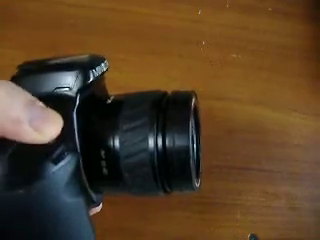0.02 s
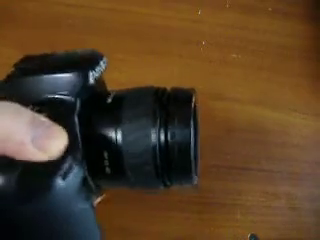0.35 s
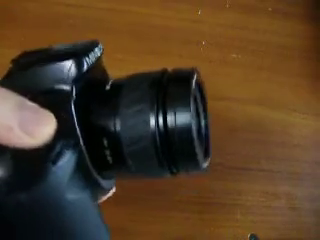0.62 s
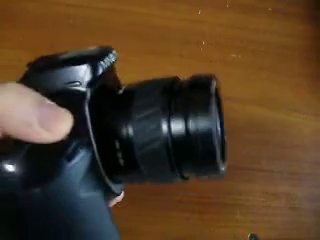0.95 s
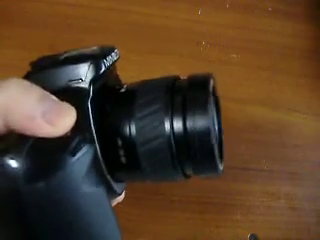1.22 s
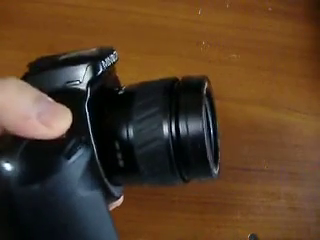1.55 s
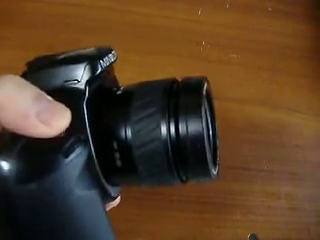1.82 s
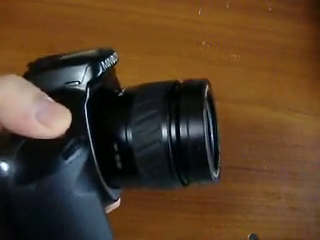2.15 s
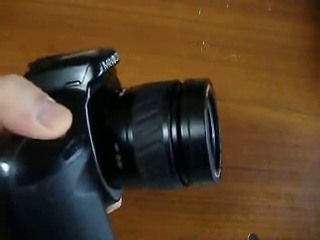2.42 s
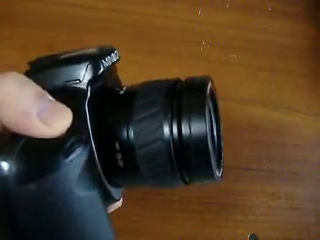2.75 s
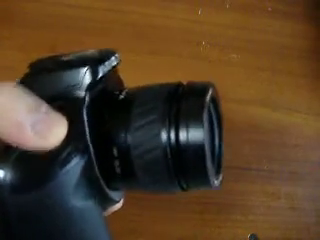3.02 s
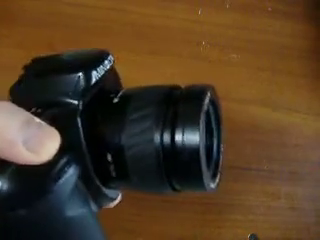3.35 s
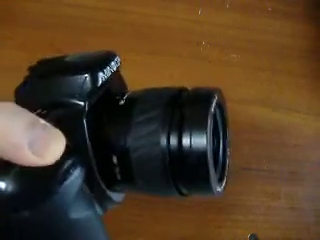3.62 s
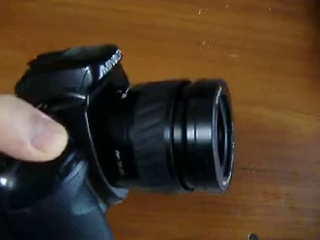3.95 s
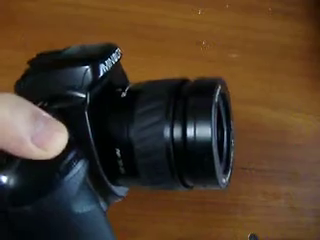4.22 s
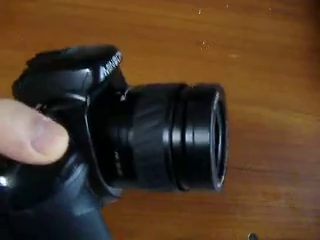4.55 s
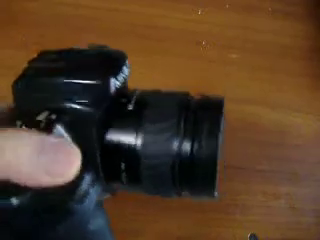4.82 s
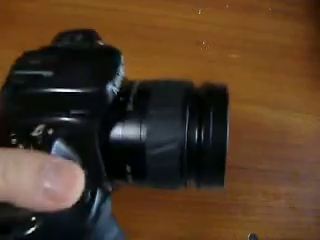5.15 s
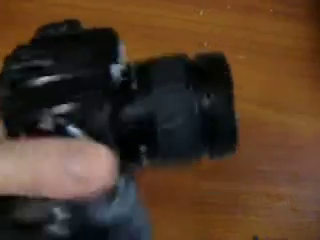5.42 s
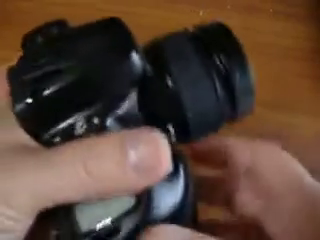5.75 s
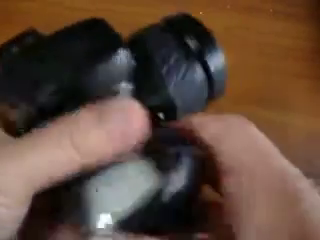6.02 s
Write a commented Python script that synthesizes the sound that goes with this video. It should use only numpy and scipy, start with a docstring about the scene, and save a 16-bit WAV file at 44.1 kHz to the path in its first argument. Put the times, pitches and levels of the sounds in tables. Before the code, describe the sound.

Small plastic gears whir and click as a camera lens hunts for focus, first in longer bursts, then in tiny chirps. The shutter then snaps loudly several times within half a second while a fast motor winds the film. Finally the hand shifts on the camera body, making faint ticks and two dull, hollow knocks. Everything is close and fairly dry, indoors, over constant microphone hiss, low rumble and a faint high whistle.

```python
"""A film SLR camera hunts for focus and fires, close to a hissy little microphone in a quiet room.
Plastic autofocus gears whine and rattle in six short bursts; then mirror and shutter clack while
a second, raspy motor cocks the mirror and winds the film on. Button and shell give small ticks, and
the hand shifts its grip over a wooden table: two dull, hollow knocks with a low thump.
Underneath lies a bed of hiss, low rumble and a thin electrical whistle."""
import sys
import numpy as np
from scipy import signal
from scipy.fft import rfft, irfft, next_fast_len
from scipy.io import wavfile
from scipy.ndimage import uniform_filter1d

SR = 44100
rng = np.random.default_rng(int(sys.argv[2]) if len(sys.argv) > 2 else 0)


def int16_out(signal):
    """Quantize to a 16-bit WAV file."""
    q = np.round(np.clip(np.atleast_2d(signal).T, -1, 1) * 32767)
    wavfile.write(sys.argv[1], SR, q.astype(np.int16))


N = 267775
TIME = np.arange(N) / SR

# EQ curves of the noise bed and of each camera sound: (frequency [Hz], gain [dB])
FLOOR_EQ = [(12, -49.5), (20, 2), (22, -9), (54, 4), (96, -2.5), (134, -1), (173, -5), (326, -7),
            (389, -9.5), (442, -9), (753, -13), (3200, -19.5), (6670, -19.5), (7200, -19), (8600, -25.5),
            (11200, -59), (18900, -120)]
TICK_EQ = [(300, -34), (1300, -16), (1900, -1.5), (3000, 6), (4500, -9), (8000, -11.5)]
KNOCK_EQ = [(120, -12), (330, -11), (550, 1), (950, 0), (1200, -5), (1700, 0), (2100, -8), (2900, -19),
            (3500, -13), (4600, -24), (6000, -35), (8500, -42)]
WIND_EQ = [(150, -26), (400, -9), (850, -1.5), (1150, -15), (1600, 4), (2200, -0.5), (3000, 6.5),
           (3600, -1), (4400, 1), (5000, -1), (5800, 3), (6600, -0.5), (8300, -6.5)]
FOCUS_EQ = [(120, -32.5), (220, -17.5), (370, -15.5), (530, -22.5), (780, -6.5), (1050, -14.5), (1400, -10),
            (1650, -1.5), (1950, -11), (2650, -6), (3500, -7), (4150, -5.5), (5400, -11.5), (6800, -7),
            (8500, -17.5)]
SHUTTER_EQ = [(120, -62), (200, -16), (467, -18.5), (847, -3.5), (1210, -8.5), (1540, 1), (1860, 2),
              (2040, -0.5), (2310, -5), (2700, 4.5), (3420, -5.5), (4400, 0), (6510, 0), (7980, -2.5),
              (8500, -10), (11000, -26), (18700, -120)]
# the microphone's electrical whistle, two close tones: (frequency [Hz], level [dB])
WHISTLE_TONES = [(7290, -60.5), (7356.5, -65)]
# rumble of the moving hands: (peak time [s], level [dB], rise [s], fall [s])
RUMBLE_SWELLS = [(3.5, -46, 0.5, 0.54), (5.5, -38.5, .08, 0.28)]
# cue lists of hard hits: (time [s], level [dB], ring time [s], treble tilt [dB/octave])
SHELL_TICKS = [(0.0655, -30, 0.01, -2), (2.7676, -32.5, 0.0064, 12.5), (4.8085, -44, 0.015, 2),
               (4.8838, -34, 0.0057, -0.5), (5.0858, -41.5, 0.011, -9), (5.4372, -31, .008, -1)]  # button and shell; the last row is the bright snap of the hand's second knock
GRIP_KNOCKS = [(5.3467, -19.5, 0.027, 0), (5.407, -39.5, 0.054, 3), (5.417, -37.5, 0.063, -3),
               (5.434, -25.5, 0.024, 2.5), (5.4635, -36, 0.0097, -1.5)]  # the hand shifts its grip
BACKLASH_HITS = [(0.894, -38.5, 0.013, -10.5), (1.116, -31, 0.025, -7.5), (1.504, -25, 0.045, -4.5),
                 (1.718, -37, 0.02, -3), (1.7255, -30.5, 0.04, -2), (3.303, -41, .02, -12),
                 (3.323, -40, 0.014, -3), (3.338, -32, 0.013, -5)]  # focus gears take up slack or meet a stop
PAWL_CATCHES = [(4.414, -38, 0.034, -1), (4.5006, -28, 0.008, -5), (4.5293, -24, 0.027, 1)]  # the pawl of the film transport catches
# soft pushes behind the knocks: (time [s], peak level [dB], contact time [s])
GRIP_PUSHES = [(5.351, -18.5, 0.0098), (5.423, -15.5, 0.0124), (5.439, -18, 0.01), (5.478, -23.5, 0.0091)]
# what a knock rings and what a push sets swaying: (frequency [Hz], relative level [dB], ring time [s])
HOLLOW_MODES = [(545, 9.5, 0.041), (700, -9, 0.066), (810, -14, .05), (985, -8, 0.055), (1340, -12, .08),
                (1570, -17, .025), (1735, 4.5, 0.043), (1870, -3, 0.11)]
SWAY_MODES = [(56.6, -3, 0.15), (88.5, -3.5, 0.12), (113.8, -1, 0.22), (134, -20, 0.088)]
# winding runs, mirror then film:
# (start [s], time under power [s], relative level [dB], unloaded tooth rate [Hz])
WIND_RUNS = [(4.181, .112, -29.5, 3066), (4.383, .182, -29, 2960)]
# whine of the winding gears: (pitch [x tooth rate], relative level [dB])
WIND_TONES = [(.333, -22), (1, -5), (1.17, -11), (1.79, -8), (2.06, -11), (2.29, -12), (2.94, -18)]
# autofocus bursts: (start [s], time under power [s], relative level [dB], swell [dB/s],
# unloaded tooth rate [Hz], direction [1 inward, 0 outward])
FOCUS_RUNS = [(0.887, .237, -34, 11, 819.5, 0), (1.256, .260, -30.5, 7.5, 797, 1),
              (1.709, .102, -36.5, -26, 560, 0), (3.296, 0.12, -32.5, -62, 560, 0),
              (3.582, 0.042, -38.5, -70, 420.6, 0), (3.792, 0.0096, -41, -61, 300, 0)]
# whine of the focus gears, relative levels: (pitch [x tooth rate], outward [dB], inward [dB], coasting [dB])
FOCUS_TONES = [(.48, -34, -25, -35), (.87, -21, -34, -35), (1, -15, -16, -26), (2, -15.5, -20, -18),
               (2.14, -25, -22, -24), (2.33, -27, -19, -26), (2.6, -21, -25, -24), (3, -19, -15, -13),
               (3.3, -23, -14, -20), (3.5, -15.5, -18, -22), (4, -24, -19, -22), (5.27, -22, -20, -13),
               (5.6, -21, -22, -14), (8.1, -22, -27, -14)]
# resonances of the lens barrel: (frequency [Hz], width [Hz], relative level [dB])
BARREL_MODES = [(1565, 55, 4), (1675, 70, 4), (2700, 250, -4), (4100, 200, -3)]
# strokes of mirror and shutter: (time [s], release level [dB], treble tilt [dB/octave], travel [s],
# landing level [dB], landing ring time [s], chatter level [dB], chatter change [dB/bounce])
SHUTTER_STROKES = [(4.1827, -35, 3, 0.0098, -33.5, 0.014, -46, -2),
                   (4.2133, -14.5, 0.5, 0.018, -16, .009, -26.5, -2.5),
                   (4.2817, -12, 4.5, 0.018, -20, 0.061, -15.5, -3.5),
                   (4.3714, -20, -0.5, .0128, -19.5, 0.037, -26.5, -8),
                   (4.5622, -14, 0, 0.016, -17.5, 0.035, -26.5, 2)]

WHEEL_TEETH = 9


def undb(db):
    """Decibels to gain."""
    return 10 ** (np.asarray(db) / 20)


def unit(x):
    """Scale to rms 1."""
    return x / np.sqrt(np.mean(x ** 2) + 1e-30)


def wander(rate):
    """Random drift of rms 1 that takes a new turn rate times a second."""
    return unit(np.interp(TIME * rate, np.arange(N), rng.standard_normal(N)))


def eq(x, curve, tilt_db=0):
    """EQ along a curve, with a tilt per octave above 600 Hz."""
    size = next_fast_len(2 * len(x))
    size += size % 2
    hz, db = np.transpose(curve)
    f = np.clip(np.arange(size // 2 + 1) * SR / size, hz[0], hz[-1])
    gain = undb(np.interp(np.log(f), np.log(hz), db) + tilt_db * np.log2(np.maximum(f / 600, 1)))
    # minimum phase: nothing rings ahead of an attack
    cepstrum = irfft(np.log(gain))
    cepstrum[1:size // 2] *= 2
    cepstrum[size // 2 + 1:] = 0
    return irfft(rfft(x, size) * np.exp(rfft(cepstrum)))[:len(x)]


def resonate(x, hz, width):
    """One resonance, gain 1 at its centre."""
    return signal.lfilter(*signal.iirpeak(hz, hz / width, fs=SR), x)


def ring(modes, t):
    """Struck modes ringing out."""
    return sum(undb(db - 60 * t / t60) * np.sin(2 * np.pi * hz * t) for hz, db, t60 in modes)


def add(out, start, x):
    """Mix x into out at start seconds."""
    i = int(start * SR)
    out[i:i + len(x)] += x[:N - i]


def hits(cues, curve, crack, tail_db, tail_s):
    """Each hit is a crack, a short dense ring of small parts and a weaker tail from the shell."""
    out, t = np.zeros(N), TIME[:SR // 5]
    for start, db, t60, tilt_db in cues:
        burst = rng.standard_normal(len(t)) * (undb(-60 * t / t60) + undb(tail_db - 60 * t / tail_s))
        burst[0] += crack
        hit = eq(burst, curve, tilt_db)
        add(out, start, hit * undb(db) / np.std(hit[:SR // 500]))  # the first 2 ms set the level
    return out


def teeth(cycles, scatter_db, scrape, slide):
    """Gear rattle: once a cycle a tooth lands with its own force, then scrapes along its partner."""
    tooth = cycles.astype(int)
    force = undb(scatter_db * rng.standard_normal(N))[tooth]
    landing = np.diff(tooth, prepend=0)
    sliding = np.exp(-(cycles % 1) / slide) * rng.standard_normal(N)
    return unit(force * (unit(landing) + scrape * unit(sliding)))


def whine(cycles, multiple, slip):
    """One mesh tone; play in the gears shakes its level and, more so on high tones, its phase."""
    flutter = undb(2.5 * wander(110))
    return unit(flutter * np.sin(2 * np.pi * multiple * cycles + slip * multiple * wander(120)))


def spin(start, length, rise_s, coast_s, friction):
    """Share of full speed: a motor runs up under power, then drag and dry friction stop it."""
    powered = np.clip(TIME - start, 0, length)
    free = np.maximum(TIME - start - length, 0)
    run_down = np.maximum((1 + friction) * np.exp(-free / coast_s) - friction, 0)
    return (1 - np.exp(-powered / rise_s)) * run_down


def background():
    """The bed: hiss and room rumble, the microphone's thin whistle and the rumble of the hands."""
    floor = undb(-48) * unit(eq(rng.standard_normal(N), FLOOR_EQ))
    whistle = sum(undb(db) * unit(np.sin(2 * np.pi * hz * TIME + 0.5 * wander(20)))
                  for hz, db in WHISTLE_TONES)
    rumble = unit(resonate(resonate(rng.standard_normal(N), hz=40, width=28), hz=41, width=44))
    resting = undb(-64.5)
    moving = sum(undb(db) * np.exp(-np.maximum((at - TIME) / rise, (TIME - at) / fall))
                 for at, db, rise, fall in RUMBLE_SWELLS)
    return floor + whistle + (resting + moving) * rumble


def room(x, t60=0.2, wet_db=-17):
    """Direct sound and the short tail of a furnished room."""
    t = TIME[:SR // 2]
    tail = rng.standard_normal(len(t)) * undb(-60 * t / t60) * (t > .004)
    return x + undb(wet_db) * signal.fftconvolve(x, tail / np.linalg.norm(tail))[:N]


def shell_ticks():
    """Button and shell give small, dry ticks; the last one is the bright snap of the hand's second knock."""
    return hits(SHELL_TICKS, TICK_EQ, crack=4.3, tail_db=-18, tail_s=0.068)


def grip_thumps():
    """Soft pushes of the hand set low modes swaying."""
    out, t = np.zeros(N), TIME[:SR // 2]
    for start, db, contact_s in GRIP_PUSHES:
        force = np.sin(np.pi * np.minimum(t / contact_s, 1)) ** 2
        sway = np.gradient(signal.fftconvolve(force, ring(SWAY_MODES, t))[:len(t)])
        add(out, start, -undb(db) * sway / np.abs(sway).max())
    return out


def grip_knocks(bounce_s=.0045):
    """Each knock touches three times, weaker and duller every time, and rings hollow modes."""
    touches = [(start + k * bounce_s, db - 5.5 * k, t60, tilt_db - 4 * k)
               for start, db, t60, tilt_db in GRIP_KNOCKS for k in range(3)]
    out = hits(touches, KNOCK_EQ, crack=2.6, tail_db=-24.5, tail_s=0.15)
    hollow = ring(HOLLOW_MODES, TIME[:SR // 2])
    for start, db, _, _ in GRIP_KNOCKS:
        add(out, start, undb(db - 9.5) * hollow)
    return out


def wind_drive(slack_s=.088, load_s=.04, sag=.16):
    """Tooth rate and gain of the winding motor: it runs up freely, then sags as it takes the load."""
    tooth_hz, gain = np.zeros((2, N))
    for start, length, db, full_hz in WIND_RUNS:
        loaded = 1 - np.exp(-np.maximum(TIME - start - slack_s, 0) / load_s)
        speed = spin(start, length, rise_s=.036, coast_s=.04, friction=.05) * (1 - sag * loaded)
        tooth_hz += full_hz * speed
        gain += undb(db) * speed ** 1.54  # faster is louder
    return np.maximum(tooth_hz, 604), gain


def wind_motor():
    """A fast, raspy motor cocks the mirror and pulls the film on; it sings as it gets up to speed."""
    tooth_hz, gain = wind_drive()
    cycles = np.cumsum(tooth_hz) / SR
    rasp = eq(teeth(cycles / WHEEL_TEETH, scatter_db=-1.5, scrape=4.5, slide=1), WIND_EQ)
    tones = sum(undb(db) * whine(cycles, multiple, slip=.24) for multiple, db in WIND_TONES)
    return gain * undb(-2) * (unit(rasp) + tooth_hz / tooth_hz.max() * tones)


def gear_backlash():
    """The focus gears click as they take up their slack or meet a stop."""
    return hits(BACKLASH_HITS, FOCUS_EQ, crack=2, tail_db=-20, tail_s=.06)


def focus_drive(lens_drag=.22, settle_s=.05, crawl_hz=250.4):
    """Tooth rate, gain, direction and coasting of the focus gears; the lens drags until under way."""
    tooth_hz, gain, inward, coasting = np.zeros((4, N))
    for start, length, db, swell_db, full_hz, direction in FOCUS_RUNS:
        powered = np.clip(TIME - start, 0, length)
        speed = spin(start, length, rise_s=.009, coast_s=.08, friction=.45)
        tooth_hz += full_hz * speed * (1 - lens_drag * np.exp(-powered / settle_s))
        gain += undb(db + swell_db * powered) * speed ** 1.18  # faster is louder
        inward += direction * (speed > 0)
        coasting += (speed > 0) * (TIME > start + length)
    coasting = uniform_filter1d(np.minimum(coasting, 1), size=300)
    return np.maximum(tooth_hz, crawl_hz), gain, inward > .5, coasting


def focus_motor():
    """A plastic gear train whines and rattles inside the lens barrel."""
    tooth_hz, gain, inward, coasting = focus_drive()
    cycles = np.cumsum(tooth_hz) / SR
    # an off-centre wheel presses harder once a turn
    wobble = undb(0.89 * np.sin(2 * np.pi * cycles / WHEEL_TEETH))
    rattle = eq(wobble * teeth(cycles, scatter_db=1.8, scrape=4, slide=1.2), FOCUS_EQ)
    barrel = sum(undb(db) * resonate(rattle, hz, width) for hz, width, db in BARREL_MODES)
    # fast teeth sing; slow ones chatter and ring the barrel
    pace = np.clip(tooth_hz / 800, 0, 1) ** 2
    out = undb(-4.7 - 3.3 * coasting) * unit(rattle)
    out += undb(-5 - 15 * pace - 5 * coasting) * unit(barrel)
    # each direction loads other flanks; with the power cut the gears run loose and chirp downward
    for multiple, out_db, in_db, coast_db in FOCUS_TONES:
        driven = pace * undb(np.where(inward, in_db, out_db))
        loose = np.sqrt(pace) * undb(coast_db + 2.5)
        tone = whine(cycles, multiple, slip=.08 + .08 * coasting)
        out += ((1 - coasting) * driven + coasting * loose) * tone
    return gain * undb(2) * out


def shutter(release_ring_s=.018, chatter_ring_s=.057, chatter_tilt_db=-2.5):
    """Mirror and shutter snap free, chatter on the way, land duller and rebound; the film pawl catches."""
    cues = []
    for start, db, tilt_db, travel, landing_db, landing_s, chatter_db, change_db in SHUTTER_STROKES:
        cues.append((start, db, release_ring_s, tilt_db))
        cues.append((start + travel, landing_db, landing_s, tilt_db - 1.5))
        for k, share in enumerate((.31, .67, 1.2)):  # the last is the rebound
            cues.append((start + share * travel, chatter_db + k * change_db,
                         chatter_ring_s, chatter_tilt_db))
    return hits(cues + PAWL_CATCHES, SHUTTER_EQ, crack=6, tail_db=-24, tail_s=0.19)


def scene():
    """Camera and hand in the room, over the noise bed, in mono."""
    clicks = shutter() + gear_backlash() + shell_ticks()
    motors = focus_motor() + wind_motor()
    handling = grip_knocks() + grip_thumps()
    return (room(clicks + motors + handling) + background())[None]


def record(dry, top_hz=8300):
    """A narrow-band recorder rounds the highest peaks and cuts off the top."""
    rounded = 0.67 * np.tanh(dry / 0.7)
    return signal.sosfilt(signal.butter(24, top_hz, fs=SR, output="sos"), rounded)


dry = scene()
out = record(dry)
int16_out(out)
```